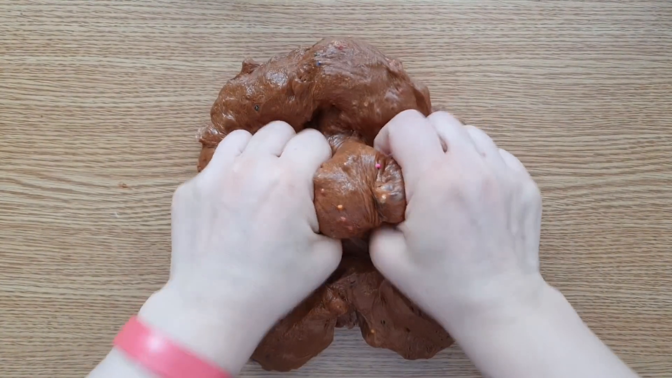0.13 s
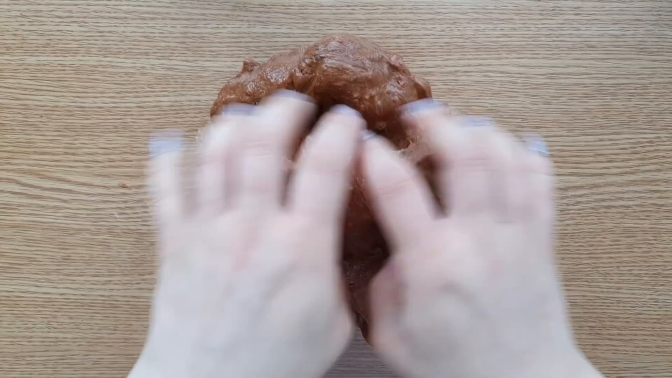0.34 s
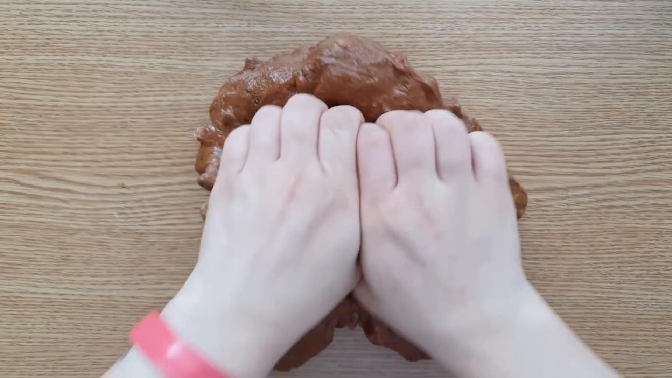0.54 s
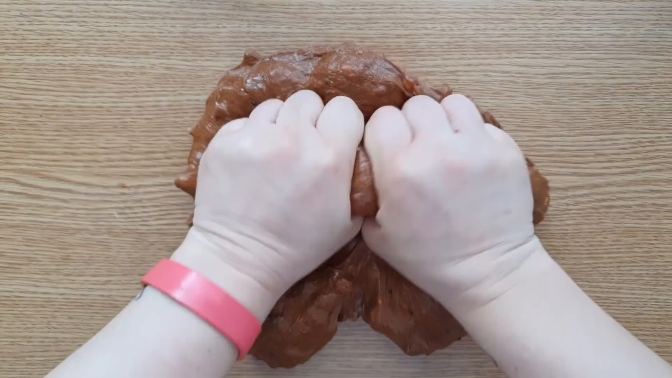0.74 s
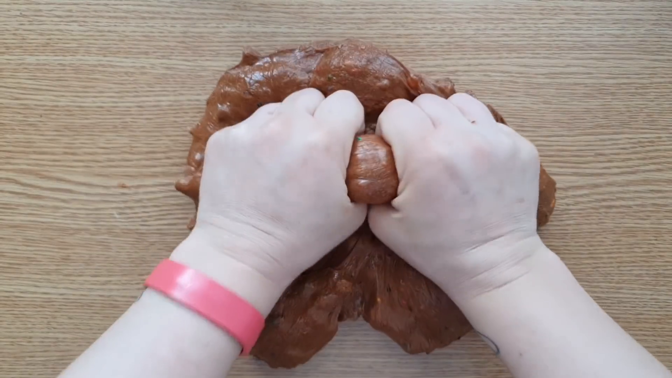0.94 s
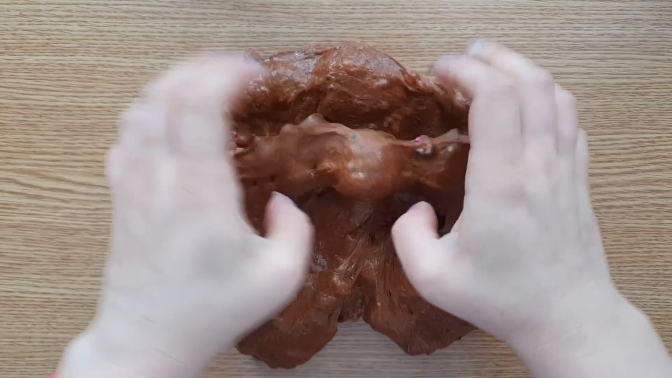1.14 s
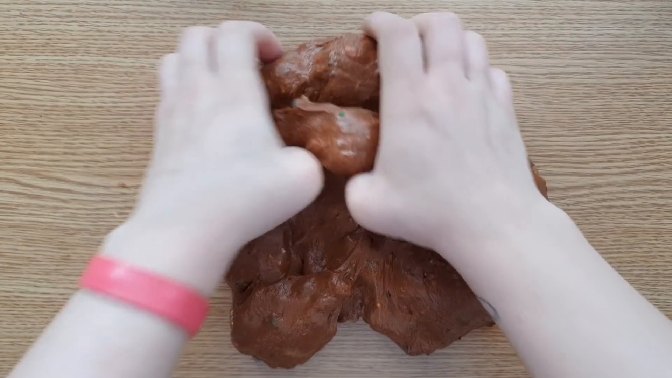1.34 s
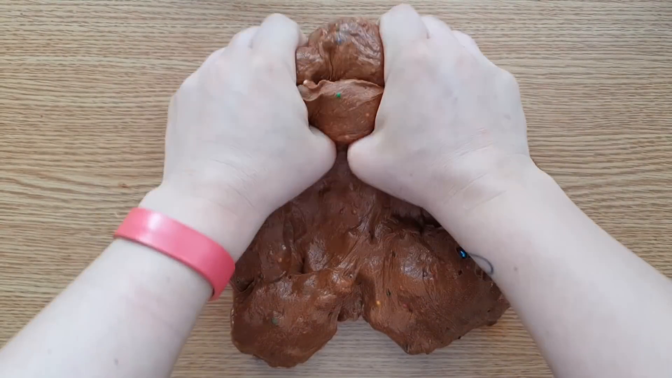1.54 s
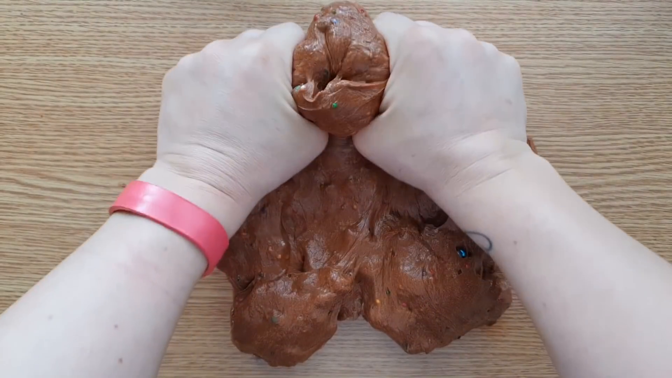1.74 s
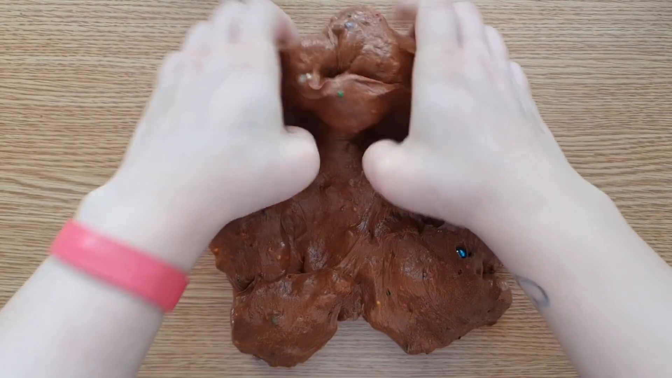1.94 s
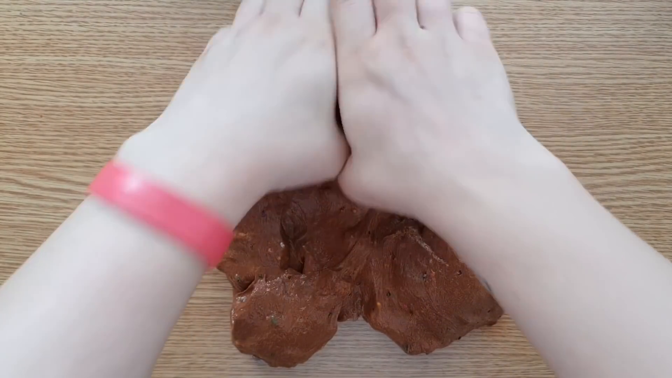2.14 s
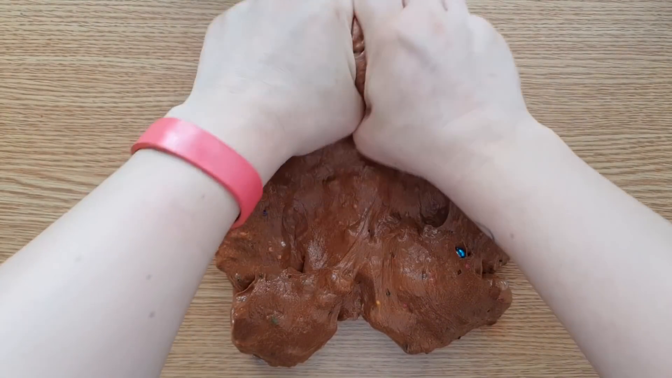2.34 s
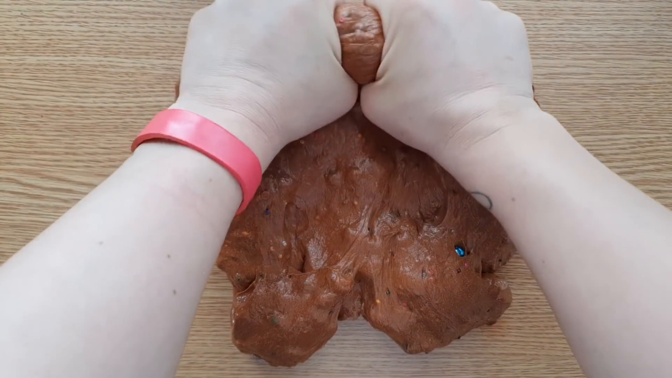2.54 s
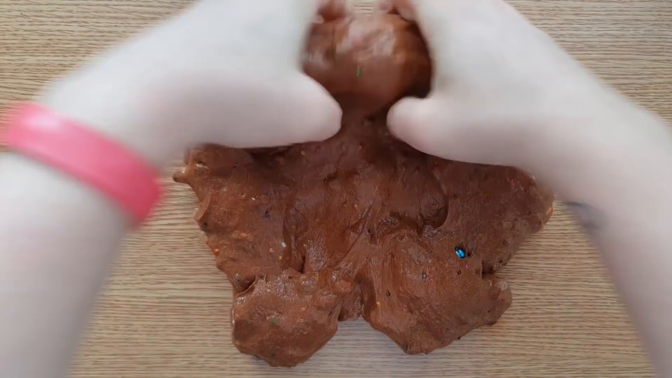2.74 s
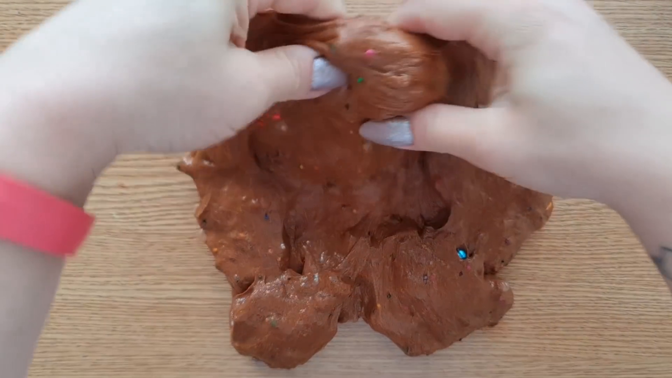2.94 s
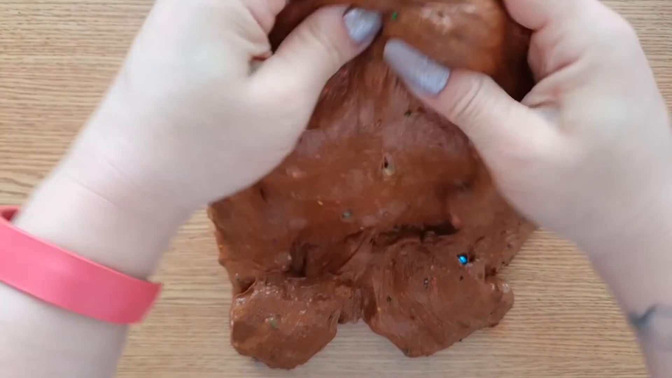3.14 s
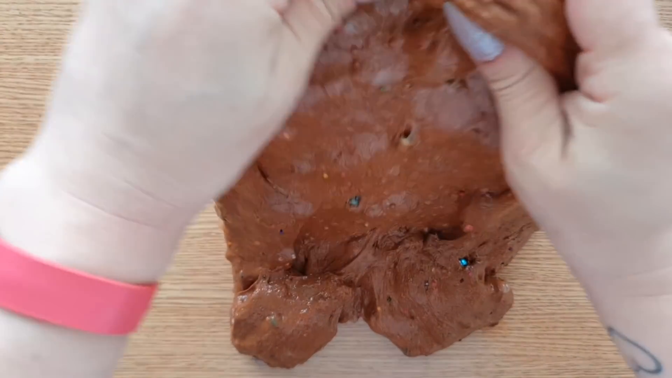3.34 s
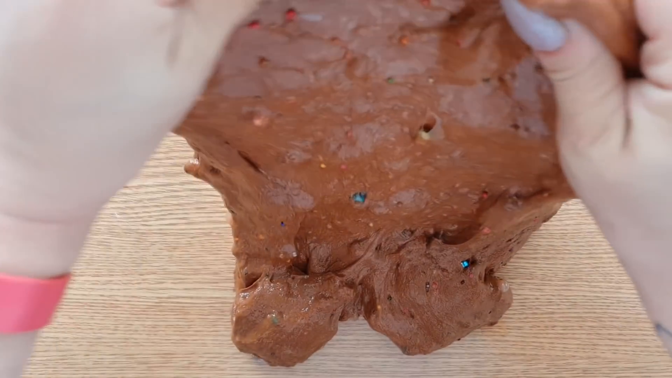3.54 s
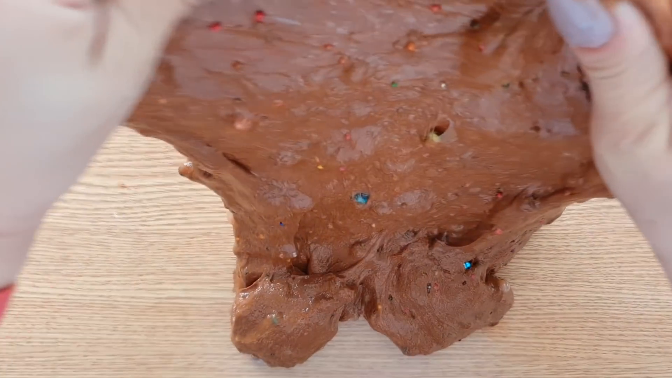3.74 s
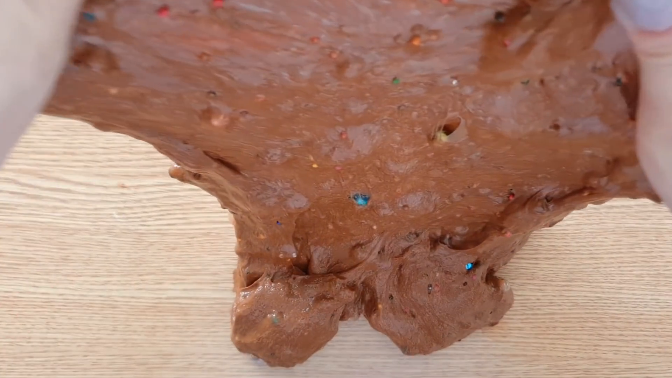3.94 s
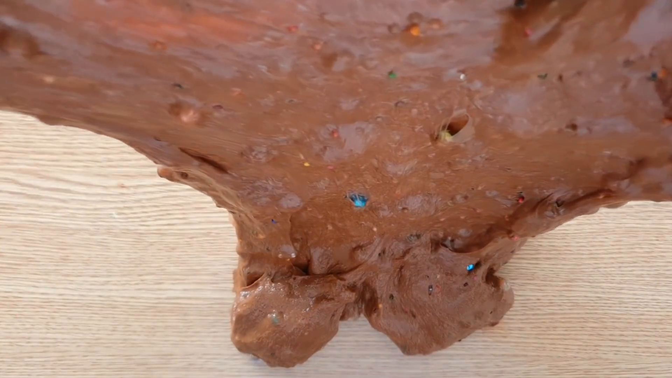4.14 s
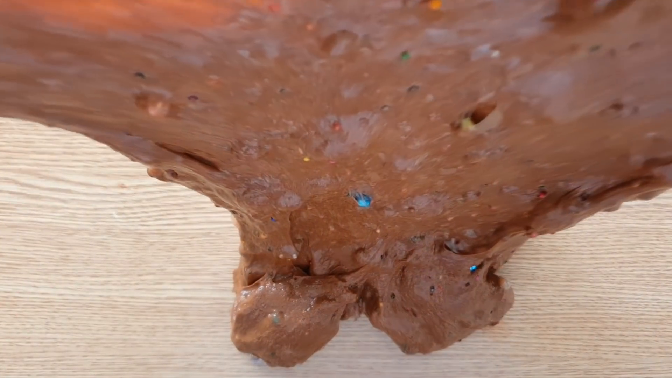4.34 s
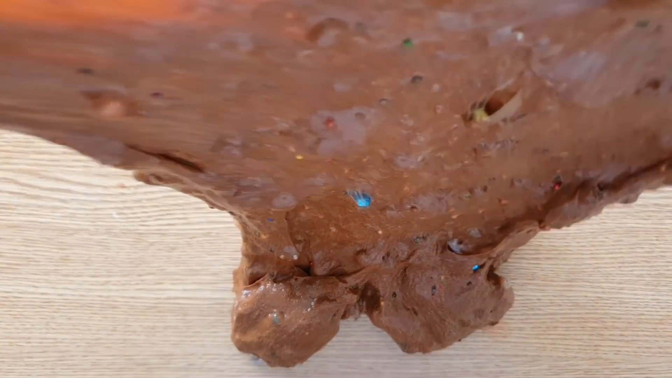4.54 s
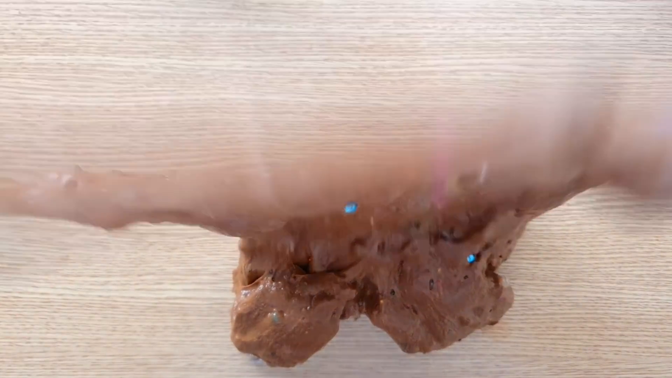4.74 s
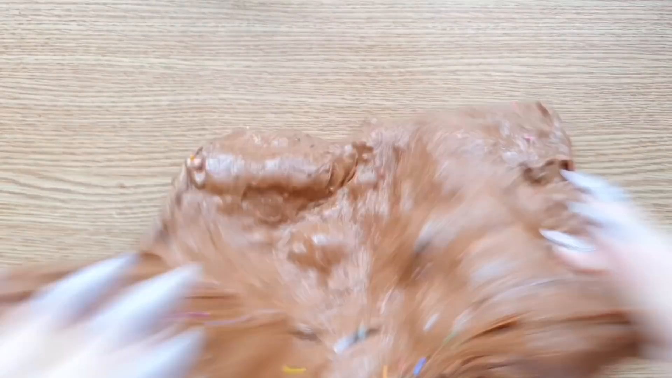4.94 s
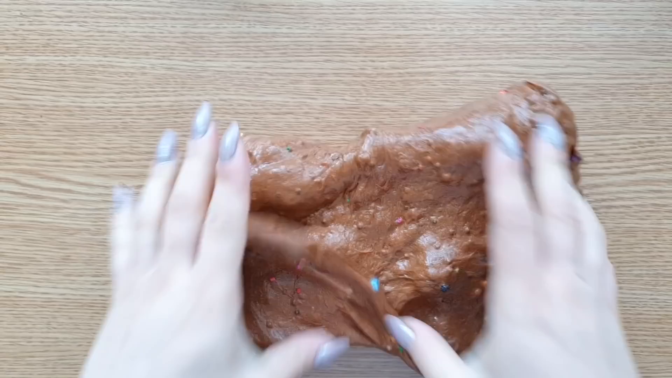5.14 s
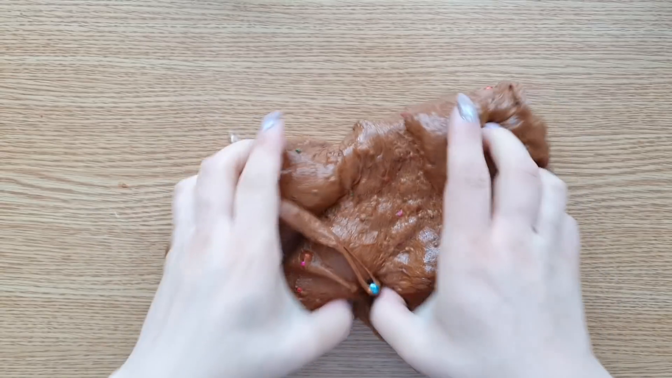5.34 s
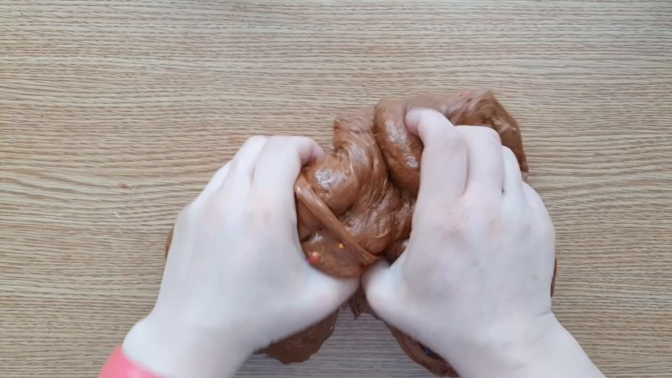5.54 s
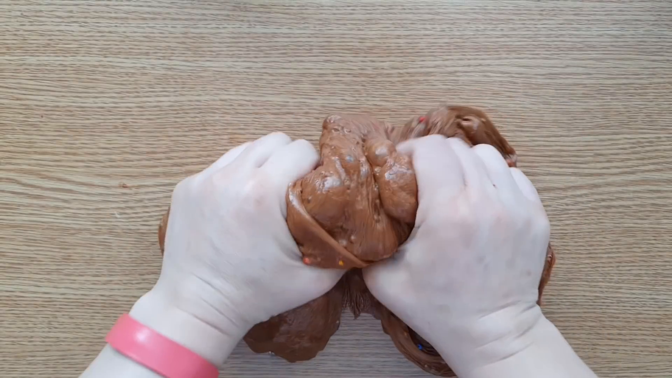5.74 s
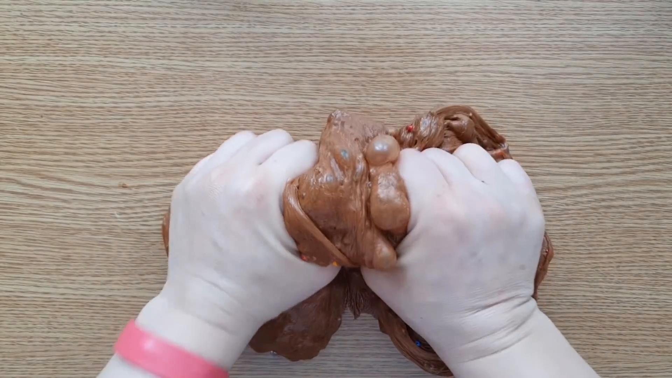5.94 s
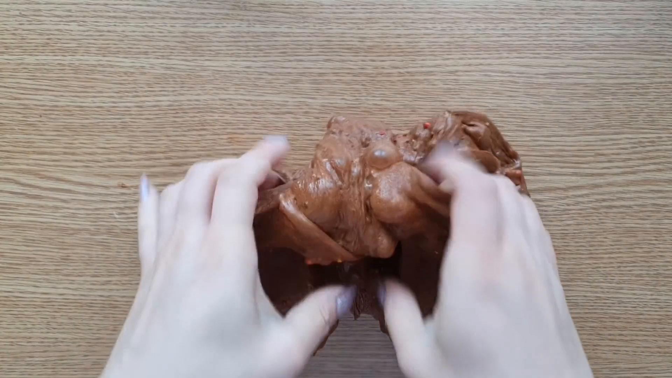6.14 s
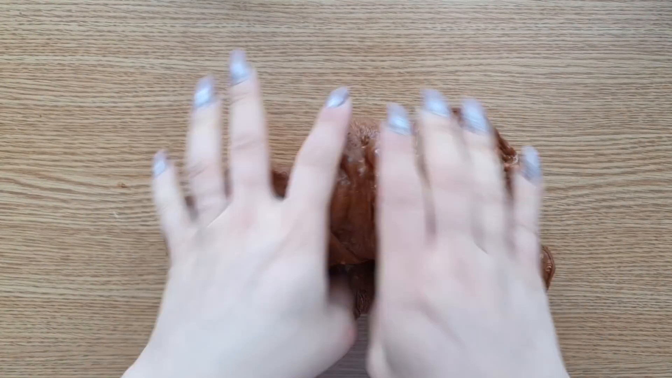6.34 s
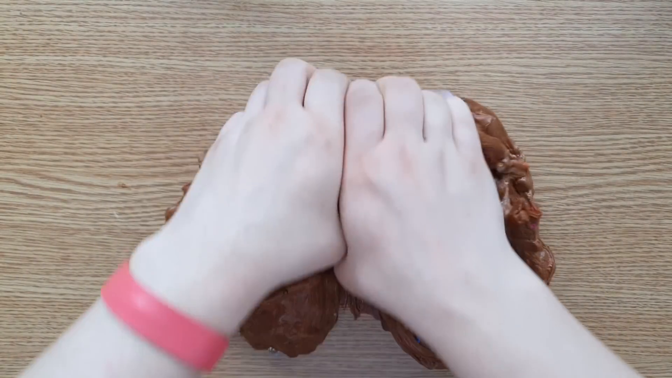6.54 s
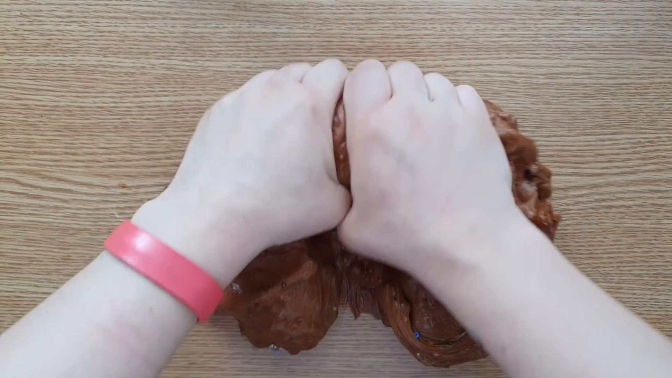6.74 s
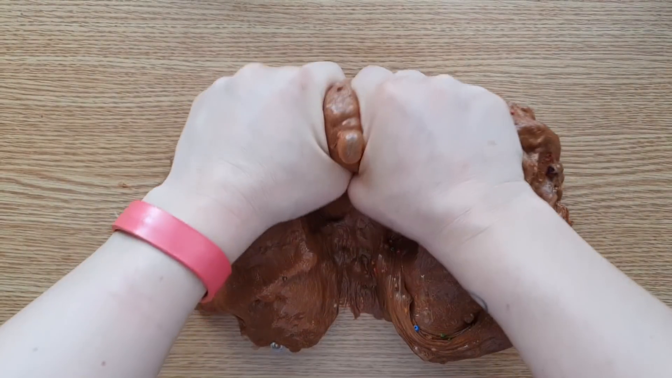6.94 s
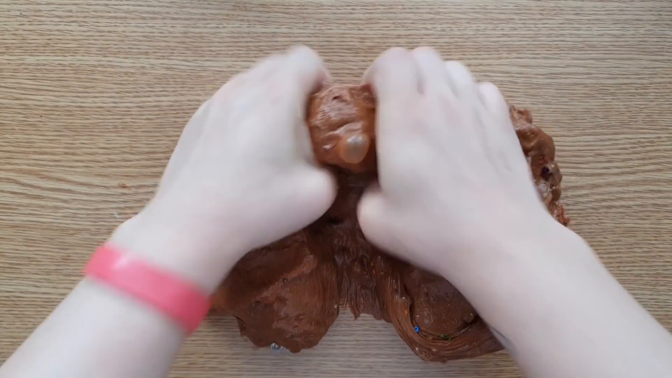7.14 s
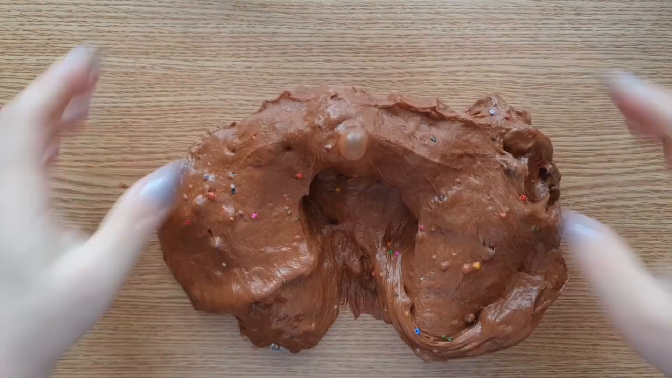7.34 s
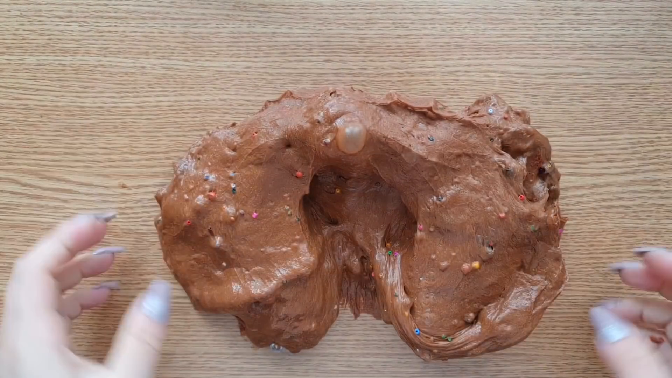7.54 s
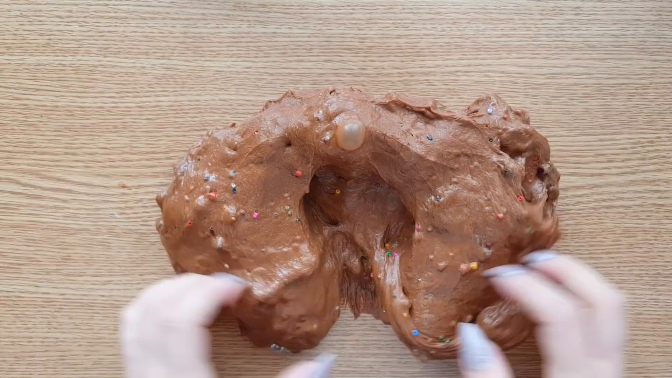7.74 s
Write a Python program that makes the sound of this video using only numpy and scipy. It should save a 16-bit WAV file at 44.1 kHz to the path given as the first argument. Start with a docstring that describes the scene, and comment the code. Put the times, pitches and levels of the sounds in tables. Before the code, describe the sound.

Sticky slime is kneaded close to the microphone. First come hard pops and crunchy crackles, then a short lull and denser squishing with many small snaps. As the slime is drawn into a sheet the sound thins to quiet fizzing. Folding it back brings squelches, short air gurgles and a burst of heavy popping, then near quiet. Soft low table thumps and brief room echo accompany it.

```python
"""A lump of crunchy slime, squeezed, stretched and folded by two hands on a wooden table, in a small, bare,
echoing room. Large air pockets burst as sharp pops: a jolt and a tear ring each cavity, the skin adds a snap.
Swarms of tiny ringing pockets, driven by the strokes of the hands, merge into mash, squelch, crackle and fizz.
Trapped air gurgles in gliding puffs; soft weight thumps as decaying low sines. Table and room resonate,
echoes of decaying noise bands follow, and hiss and rumble of shaped noise lie beneath."""
import sys
import numpy as np
from scipy import signal
from scipy.fft import rfft, irfft, next_fast_len
from scipy.io import wavfile

SR = 44100
rng = np.random.default_rng(int(sys.argv[2]) if len(sys.argv) > 2 else 0)


def output_pcm(signal):
    """Save a mono or channel-first signal as 16-bit PCM at the path in sys.argv[1].

    Samples are clipped to [-1, 1] before scaling.
    """
    pcm = np.clip(np.atleast_2d(signal).T, -1, 1) * 32767
    wavfile.write(sys.argv[1], SR, np.round(pcm).astype(np.int16))


N = 343963
TIME_S = np.arange(N) / SR

# Background noise spectra. Each row: frequency in Hz, relative density in dB.
HISS_SPECTRUM = [(100, 20), (250, 2.5), (550, -11.5), (1200, -6.5), (4000, -15.5), (9000, -19),
                 (16000, -32)]
RUMBLE_SPECTRUM = [(20, -35), (32, -17), (44, 5), (60, -13.5), (85, -14), (140, -17), (300, -35),
                   (1000, -78.5), (20000, -120)]
HISS_DB, RUMBLE_DB = -73.5, -66

# Soft weight landing on the table. Each row: start in seconds, level in dB, frequency in Hz.
TABLE_THUMPS = [(0.169, -44, 62), (0.251, -42.5, 71), (1.0, -45, 127), (1.055, -44, 54),
                (1.891, -42, 125.8), (2.257, -51, 41), (2.501, -44, 44.5), (4.181, -58, 45.4),
                (4.42, -56.5, 46.24), (4.98, -47, 57.82), (5.049, -49, 67.6), (5.435, -44, 61.52),
                (6.03, -50, 78.85), (6.36, -47.5, 43.95), (6.498, -46.5, 54.05), (7.161, -44, 124.5),
                (7.199, -46, 65.02)]

# Room decay. Each row: frequency in Hz, time to fall 60 dB in seconds.
ROOM_DECAY = [(150, 0.48), (600, 0.3), (1400, 0.37), (3700, 0.36), (8000, 0.24), (15000, 0.23)]
# Colour of the echo. Each row: frequency in Hz, relative level in dB.
ECHO_COLOUR = [(100, -7), (400, -1.5), (1000, -1.5), (3000, -1.5), (8000, 1), (15000, -5)]
# Low resonances of table and room. Each row: frequency in Hz, time to fall 60 dB in seconds, relative level in dB.
LOW_RESONANCES = [(67, .4, -7.5), (122, 0.4, -7.5), (205.9, 0.71, -6.5), (243.6, 0.5, -7), (433, .4, -15.5)]

# Trapped air leaving a fold. Each row: start in seconds, length in seconds, first Hz, last Hz, level in dB.
AIR_GURGLES = [(1.231, 0.083, 1050, 850, -62), (1.903, .019, 566, 510, -52), (3.01, 0.037, 272.8, 250, -52),
               (4.872, 0.062, 763, 800, -54.5), (5.225, 0.0093, 940, 900, -40.5),
               (5.26, .06, 930, 540, -41.5), (5.385, 0.092, 277.4, 268.4, -46.5),
               (6.127, .023, 2900, 2720, -40.5), (6.208, .02, 279.5, 250, -43),
               (6.515, 0.052, 776, 650, -45), (7.089, 0.0093, 511.6, 477.3, -35)]

# Pitches of the small bursts. Each row: cavity pitch in Hz, relative level per burst in dB.
MASH_PITCHES = [(130, -4.5), (200, -1), (300, 8.5), (480, -1)]
SQUELCH_PITCHES = [(520, 3.5), (750, -4.5), (1000, 8), (1350, -3)]
CRACKLE_PITCHES = [(1450, -3), (2200, 0.2), (3300, 3), (5300, -4.9)]
FIZZ_PITCHES = [(5700, 1), (7500, 0), (11000, -1.6), (15500, -1)]

# Strokes of the hands. Each row: start in seconds, length in seconds, then levels in dB of palms mashing,
# air squelching, small bubbles crackling, sticky film fizzing.
HAND_STROKES = [(0.0, .025, -56.5, -44, -36, -39), (0.127, 0.088, -42, -44, -42, -48),
                (0.543, .16, -68, -64, -62, -76), (0.745, .1, -44, -50, -47, -64),
                (0.99, .065, -48, -43.5, -42.5, -52.5), (1.278, 0.089, -68, -58, -59, -69.5),
                (1.47, .18, -61.5, -62, -54, -61), (1.846, 0.087, -48, -49, -45, -55.5),
                (2.171, .1, -73, -66, -56, -67.5), (2.31, .2, -61, -53, -50, -58),
                (2.619, 0.094, -50, -46.5, -46, -50), (2.76, .1, -58, -50, -49, -53.5),
                (2.99, 0.043, -51.5, -51, -55, -53), (3.092, 0.13, -68, -60.5, -59, -65.5),
                (4.576, 0.12, -82, -69.5, -66, -60.5), (4.729, .13, -73, -71, -56, -57),
                (5.0, .11, -64, -70, -67.5, -69), (5.246, 0.064, -57, -51, -50, -63.5),
                (5.335, 0.16, -47, -51, -50.5, -55.5), (5.551, .19, -52, -50, -53.5, -63.5),
                (5.81, .08, -41, -47, -50, -50), (6.01, .11, -42, -45, -41, -48),
                (6.385, 0.043, -77, -84.5, -75, -73.5), (6.516, .035, -49.5, -47, -53, -70),
                (6.694, 0.055, -31, -51.5, -48.5, -47.5), (6.831, .15, -43, -47.5, -49.5, -56.5),
                (7.09, .075, -48.5, -41.5, -40.5, -48.5), (7.434, 0.037, -88.5, -64, -61, -74),
                (7.747, 0.066, -70.5, -61, -64.5, -72)]
# Time to rise or fall 20 dB: a fixed part plus a share of the stroke length.
ATTACK_S, ATTACK_SHARE = .015, .3
RELEASE_S, RELEASE_SHARE = .03, .2

# Slime drawn out into a thinning sheet. Each row: time in seconds, fizz curve in dB.
STRETCHED_SHEET = [(3.25, -60), (3.566, -62.5), (3.688, -68), (3.952, -70), (4.088, -67), (4.5, -71)]
STRETCH_FADE_S = .06   # per 20 dB
# Sheet level against its fizz curve. Columns: mash, squelch, crackle, fizz, all in dB.
SHEET_MIX_DB = [-13, -16, -13, -5.5]
# Slime settling by itself. Columns: mash, squelch, crackle, fizz, all in dB.
SETTLING_SLIME_DB = [-90, -92, -89, -95]
SLIPS_PER_S, SLIP_DB = 55, 1.76   # uneven yielding under the fingers

# Larger air pockets. Each row: start in seconds, ring in dB, cavity pitch in Hz, cavity Q, snap of the skin in dB,
# left over right in dB, send to the room in dB.
AIR_POCKETS = [(0.007, -17.5, 4200, 2.3, -50, 3, -1), (0.158, -34, 2500, 1.2, -49, 2.5, 9),
               (0.3975, -44, 4560, 0.35, -75.5, -1, 0), (0.5059, -49, 4770, 0.67, -68, 9.5, 9),
               (0.5292, -41, 3670, 1.34, -51, 2, -7.5), (0.609, -41, 4370, 0.96, -49, 1, 8),
               (0.6156, -31.5, 4050, 2.1, -26, 1, -13), (0.635, -40.5, 1370, 0.72, -32, 6, -7.5),
               (0.6776, -38, 2640, 0.78, -48, -3, -9.5), (0.726, -11, 2300, 1.43, -46.5, 1, 5.5),
               (0.7717, -30.5, 2330, 1.6, -17, -2, -7.5), (0.84, -18.5, 2920, 0.66, -24.5, 7, 2),
               (1.2486, -49, 2360, .9, -63, 12.5, -5), (1.292, -48.5, 2020, .9, -71, 9.5, 7.5),
               (1.3805, -33.5, 2534, 0.43, -39, 14, 4), (1.3851, -27, 5510, .9, -58, 1.5, -11.5),
               (1.3995, -30, 3835, 0.47, -55, -3.5, -3), (1.4916, -35.5, 5690, 1.06, -61, 5.5, 0),
               (1.543, -34.5, 2950, 2.1, -60, 13, 7.5), (1.5249, -33, 2930, 1.5, -31.5, 3, 1.5),
               (1.5697, -36, 2530, 1.5, -31, 3, -2), (1.6123, -30, 2600, 1.2, -62, 0, -3),
               (1.6359, -23.5, 3530, 1.3, -29, 5, 5.5), (1.6524, -33, 3000, 1.1, -23, -5.5, 4),
               (1.661, -19.5, 5305, 1.07, -22, -2.5, -2.5), (1.8604, -27.5, 1880, 1.7, -55, 2, -3),
               (2.108, -47, 2710, 1.9, -56, 4, 1), (2.1542, -47, 2637, 2.1, -69, 8, -33),
               (2.2237, -37, 2410, 1.36, -67, 4, 4.5), (2.2587, -33.5, 8000, 0.65, -65, 4, -3),
               (2.3804, -27.5, 4570, 1.5, -27.5, -0.5, -15), (2.3012, -30.5, 2388, 2, -58, 1, 3.5),
               (2.338, -27, 3720, 1.4, -31.5, 2.5, -5), (2.387, -24, 4000, 0.9, -29, 0.5, 2),
               (2.4345, -23, 2290, 1.1, -24, 1, -5), (2.4832, -19, 4097, 1.28, -15.5, -2, -1),
               (2.4908, -31, 1850, 1.3, -17.5, 3, -11), (2.5303, -21, 2650, 0.65, -41, 1.5, -3),
               (2.9798, -27.5, 3806, 1.43, -31.5, 6.5, -1), (3.2922, -49, 1234, 3.6, -44.5, 3, 2),
               (3.3674, -43, 2050, 0.76, -82, 2, 6.5), (3.4753, -44, 4565, 0.89, -70, 9.5, -5.5),
               (3.546, -51, 1300, 2.4, -48, 5, -6), (3.652, -36, 7090, 1.33, -58, -0.5, -2.5),
               (3.863, -51, 6550, 3.5, -62, 6, -5), (3.922, -48, 9990, 3.05, -63, -8, -3.5),
               (4.0824, -41.5, 11600, 3.95, -52.5, -7, -5.5), (4.129, -42, 12000, 4.6, -47.5, -1.5, -7.5),
               (4.2216, -28.5, 11600, 7.8, -42.5, -9, -4), (4.4311, -59.5, 6700, 2.2, -73, 13, 1),
               (4.5089, -55.5, 4053, 0.96, -72, 2, 2), (4.5579, -46, 3733, 1.06, -69, 15, 5.5),
               (4.7942, -43, 2800, 4.1, -65, 18, 2), (4.8622, -38, 903, 8, -57.5, 2, -7),
               (4.9373, -44.5, 2986, 0.64, -42, 15, 1), (5.0487, -47, 910, 4.1, -72, 3.5, 1.5),
               (5.1538, -41.5, 2906, 3.6, -78, 6.5, -1.5), (5.2136, -39.5, 3030, 1.7, -69.5, 10, 5.5),
               (5.2524, -39, 3750, 1.8, -43, 14, -13), (5.3365, -21.5, 2266, 0.44, -46, 7, -1.5),
               (5.406, -34.5, 900, 1.47, -23.5, 17.5, 1.5), (5.4302, -32, 1235, 2.9, -28, 2, 0.5),
               (5.5746, -40.5, 3170, 0.78, -43, 0.5, 10), (5.6127, -33.5, 1469, 1, -32, 5.5, -22),
               (5.6895, -29, 1749, 0.83, -34.5, -2, 3.5), (5.702, -22.5, 3597, 3.4, -42, 4, -6),
               (5.7109, -21, 3460, 3.3, -51.5, 2.5, -10), (5.7951, -10, 3200, 2.37, -21, 0, 4.5),
               (6.0906, -31, 590, 3.7, -54, -4.5, 0), (6.1123, -24.5, 2600, 1.41, -43, 5.5, -19.5),
               (6.2094, -31.5, 2780, .9, -34.5, 2.5, -6), (6.3764, -53, 761.3, 0.95, -80, -4.5, -1),
               (6.4961, -36.5, 2199, 0.41, -46.5, 8.5, 7.5), (6.653, -25.5, 2567, 0.99, -36.5, 2, -6.5),
               (6.6785, -28, 1007, 0.8, -43.5, 0, -11), (6.696, -8.5, 1260, 1.5, -49, -1.5, 3),
               (6.7352, -7.5, 2470, 1.4, -15, 7.5, -3.5), (6.8038, -5.5, 2355, 0.97, -16.5, 8.5, -3.5),
               (6.8378, -23.5, 2479, 1.25, -52, -2.5, 3.5), (6.8545, -16.5, 4390, 0.94, -25, 6.5, -4.5),
               (6.8605, -5.5, 759, 3.13, -24, -4, -2.5), (6.8694, -14.5, 1990, 0.58, -54, 1.5, -4.5),
               (6.8869, -16.5, 1837, 0.57, -25.5, -3, 8), (6.9428, -19.5, 11500, 3.4, -23, 7.5, -1),
               (6.9513, -24, 2311, 0.84, -12.5, -6.5, -15), (7.4212, -58.5, 2017, 0.96, -71.5, 6, 14.5),
               (7.7051, -54, 2761, 1.3, -80, 7, 7.5)]

CUTOFF_HZ = 15800


def from_db(db):
    """Decibels to gain."""
    return 10 ** (np.asarray(db) / 20)


def rms_one(x):
    """Scale to rms 1."""
    return x / np.sqrt(np.mean(x ** 2) + 1e-30)


def unit_energy(x):
    """Scale a short sound to energy 1 in each channel."""
    return x / np.sqrt(np.sum(x ** 2, axis=-1, keepdims=True) + 1e-30)


def at_hz(points, hz):
    """Read a table on a log-frequency axis."""
    known_hz, values = np.transpose(points)
    return np.interp(np.log(np.maximum(hz, 1)), np.log(known_hz), values)


def cut(x, hz, kind, order=2):
    """Butterworth filter."""
    sos = signal.butter(order, np.minimum(hz, .45 * SR), kind, fs=SR, output="sos")
    return signal.sosfilt(sos, x)


def drift(per_s):
    """Slow random wandering of rms 1."""
    knots = rng.standard_normal(4000)
    return rms_one(np.interp(TIME_S * per_s, np.arange(len(knots)), knots))


def add(track, start_s, sound):
    """Mix a sound in at its moment."""
    start = max(round(start_s * SR), 0)
    part = sound[..., :track.shape[-1] - start]
    track[..., start:start + part.shape[-1]] += part


def coloured(spectrum):
    """Two unrelated channels of steady noise with the given spectrum, rms 1."""
    size = next_fast_len(N, True)
    gain = from_db(at_hz(spectrum, np.fft.rfftfreq(size, 1 / SR)))
    noise = irfft(rfft(rng.standard_normal((2, size))) * gain, size)
    return rms_one(noise[:, :N])


def quiet_background():
    """Unrelated hiss in the two channels over a nearly central rumble."""
    centre, side = coloured(RUMBLE_SPECTRUM)
    rumble = centre + .15 * side * [[1], [-1]]
    return from_db(HISS_DB) * coloured(HISS_SPECTRUM) + from_db(RUMBLE_DB) * rumble


def room(x, build_s=0.00067, hold_s=0.054, alike_hz=900):
    """A bright early reflection, then a dense tail, decaying band by band and alike at both ears in the bass."""
    t, hz = np.arange(SR) / SR, np.fft.rfftfreq(SR, 1 / SR)
    first_echo_s = .0053
    mid, side = rfft(rng.standard_normal((2, SR)))
    alike = 1 / (1 + (hz / alike_hz) ** 2)
    field = np.sqrt(1 + alike) * mid + np.sqrt(1 - alike) * side * [[1], [-1]]
    field = field * from_db(at_hz(ECHO_COLOUR, hz))
    swell = 1 - np.exp(-np.maximum(t - first_echo_s, 0) / build_s)
    reflection = signal.unit_impulse(SR, round(first_echo_s * SR))
    response = from_db(-14) * cut(reflection, 7000, "high")
    edges_hz = np.r_[0, np.geomspace(150, SR / 2, 14)]
    for low_hz, high_hz in zip(edges_hz, edges_hz[1:]):
        t60_s = at_hz(ROOM_DECAY, (low_hz + high_hz) / 2)
        # nearly level at first, then falling
        decay = unit_energy(swell * from_db(-60 * np.hypot(t, hold_s) / t60_s))
        band = irfft(field * ((hz >= low_hz) & (hz < high_hz)), SR)
        response = response + band * decay / np.sqrt(2)
    return signal.fftconvolve(x, response, axes=1)[:, :N]


def booms(x):
    """Pressing sets the low resonances of table and room ringing as decaying sines."""
    t = np.arange(SR) / SR
    response = np.zeros(SR)
    for hz, t60_s, level_db in LOW_RESONANCES:
        ring = np.sin(2 * np.pi * hz * t) * from_db(-60 * t / t60_s)
        response += from_db(level_db) * unit_energy(ring)
    return signal.fftconvolve(x.mean(0), response)[:N]


def thumps(rise_s=0.0047, t60_s=.35):
    """The table gives a dull, slowly starting swing under the soft weight."""
    out, t = np.zeros(N), np.arange(SR // 2) / SR
    for start_s, level_db, hz in TABLE_THUMPS:
        envelope = from_db(level_db - 60 * t / t60_s) * (1 - np.exp(-t / rise_s))
        add(out, start_s, envelope * np.sin(2 * np.pi * hz * t))
    return out


def cavity(push, hz, q):
    """An opened air pocket rings for a few cycles; the soft wall dulls all far above its pitch."""
    hz = min(hz, .42 * SR)
    b, a = signal.iirpeak(hz, max(q, hz / (.4 * SR)), fs=SR)
    ringing = signal.lfilter(b, a, push + 1e-18)
    return cut(ringing, 3 * hz, "low")


def gurgles(puffs_per_s=160, q=7, waver_db=2.0):
    """Air escapes in quick uneven puffs, each ringing a pocket whose pitch glides as the fold moves."""
    out = np.zeros(N)
    for start_s, length_s, first_hz, last_hz, level_db in AIR_GURGLES:
        chance = rng.standard_normal((24, 3))
        puffs = max(round(length_s * puffs_per_s), 1)
        for k, (late, detune, strength) in enumerate(chance[:puffs]):
            along = np.clip((k + 0.31 * late) / puffs, 0, 1)
            hz = first_hz * (last_hz / first_hz) ** along * from_db(waver_db * detune)
            puff = unit_energy(cavity(signal.unit_impulse(1024), hz, q))
            gain = np.sqrt(SR / puffs_per_s) * from_db(level_db + 2 * strength)
            add(out, start_s + along * length_s, puff * gain)
    return out


def held(start_s, end_s, attack_s, release_s):
    """Envelope in dB: swell, hold at 0, let go; the times are per 20 dB."""
    before = np.clip((start_s - TIME_S) / attack_s, 0, 6)
    after = np.clip((TIME_S - end_s) / release_s, 0, 6)
    return -20 * (before + after)


def kneading():
    """Level in dB of each swarm: the strongest of strokes, stretched sheet and settling slime, made uneven."""
    times_s, sheet_db = np.transpose(STRETCHED_SHEET)
    sheet = np.interp(TIME_S, times_s, sheet_db)
    sheet = sheet + held(times_s[0], times_s[-1], STRETCH_FADE_S, STRETCH_FADE_S)
    levels_db = np.maximum(np.c_[SETTLING_SLIME_DB], sheet + np.c_[SHEET_MIX_DB])
    for start_s, length_s, *swarm_db in HAND_STROKES:
        attack_s = ATTACK_S + ATTACK_SHARE * length_s
        release_s = RELEASE_S + RELEASE_SHARE * length_s
        push = held(start_s, start_s + length_s, attack_s, release_s)
        levels_db = np.maximum(levels_db, push + np.c_[swarm_db])
    return levels_db + SLIP_DB * drift(SLIPS_PER_S)


def bursts(level_db, pitches, per_s, spread_db, q, pan_db, count=10):
    """A swarm of tiny pockets of random size, pitch and place; a harder squeeze bursts more of them, in clumps."""
    # per_s is the rate at -49 dB, before clumping
    rate = per_s * from_db((level_db + 49) / 4 + 3 * drift(60))
    born = np.flatnonzero(rng.random(N) < rate / SR)
    size, pan, sign, kind = rng.random((len(born), 4)).T
    size = from_db(spread_db * np.minimum(-np.log(1 - size), 3.2)) * np.sign(sign - .5)
    # rarer bursts are made stronger, so that the swarm follows level_db
    size = rms_one(size) * np.sqrt(SR / rate[born]) * from_db(level_db[born])
    sides = from_db(pan_db * (2 * pan - 1) * np.array([[1], [-1]]))
    centres_hz = np.geomspace(pitches[0][0], pitches[-1][0], count)
    gains = rms_one(from_db(at_hz(pitches, centres_hz)))
    out = np.zeros((2, N))
    for k, (hz, gain) in enumerate(zip(centres_hz, gains)):
        mine = (kind * count).astype(int) == k
        length = round(12 * SR / hz)   # twelve cycles
        ring = cavity(signal.unit_impulse(length), hz, q)
        shape = gain * unit_energy(cut(ring, hz / 2, "high"))
        where = (born[mine, None] + np.arange(length)).ravel()
        for channel, side in zip(out, sides):
            rings = np.outer((size * side)[mine], shape).ravel()
            channel += np.bincount(where, rings, N)[:N]
    return out


def placed(sound, pan_db, lag_s):
    """Place a source by level and arrival time; a positive lag delays the right channel."""
    lag = round(lag_s * SR)
    pair = [np.roll(sound[0], max(-lag, 0)), np.roll(sound[1], max(lag, 0))]
    return np.array(pair) * from_db([[pan_db / 2], [-pan_db / 2]])


def pop(push, ring_db, hz, q, snap_db, low_cut_hz=200, snap_hz=5600):
    """A push rings the cavity, and the bursting skin adds a bright snap; levels are rms over 3 ms."""
    ring = unit_energy(cut(cavity(push, hz, q), low_cut_hz, "high", order=1))
    snap = unit_energy(cut(cut(push + 1e-18, snap_hz, "high"), 14000, "low"))
    return np.sqrt(.003 * SR) * (from_db(ring_db) * ring + from_db(snap_db) * snap)


def pops(count=2):
    """Each pocket gives way with a jolt and a short tear of its skin; returns near sound and alternating room feeds."""
    near, sent = np.zeros((2, N)), np.zeros((count, 1, N))
    t = np.arange(512) / SR
    jolt = 1.0 * (t == 0)
    for k, (start_s, ring_db, hz, q, snap_db, pan_db, room_db) in enumerate(AIR_POCKETS):
        rip = rng.standard_normal((2, len(t)))
        tear = unit_energy((rip + .6 * rip[::-1]) * np.exp(-t / .0011))
        lag_s = .00003 + .000008 * pan_db + .00002 * rng.standard_normal()
        sound = pop(np.vstack([jolt + tear, jolt]), ring_db, hz, q, snap_db)
        add(near, start_s, placed(sound[:2], pan_db, lag_s))
        # for a smooth echo, the room feed is ring and snap of the jolt alone
        add(sent[k % count], start_s, sound[2] * from_db(room_db))
    return near, sent


def scene():
    """Pops, gurgles and swarms of small bursts under the hands, in the room, over its quiet background."""
    mash_db, squelch_db, crackle_db, fizz_db = kneading()
    mash = bursts(mash_db, MASH_PITCHES, per_s=500, spread_db=7, q=2.1, pan_db=3.0, count=6)
    squelch = bursts(squelch_db, SQUELCH_PITCHES, per_s=600, spread_db=6.0, q=4.6, pan_db=5.5, count=7)
    crackle = bursts(crackle_db, CRACKLE_PITCHES, per_s=650, spread_db=1.5, q=4.2, pan_db=9)
    fizz = bursts(fizz_db, FIZZ_PITCHES, per_s=2600, spread_db=4, q=2.2, pan_db=12, count=7)
    # sparser, middling pockets tick out of the crackle
    ticks = bursts(crackle_db, CRACKLE_PITCHES, per_s=55, spread_db=3.0, q=0.61, pan_db=8, count=5)
    ticks = from_db(-5.5) * ticks
    swarm = mash + squelch + crackle + fizz + gurgles()
    near, sent = pops()
    # pops alternate between two random echo patterns; the swarm has a third
    pop_echoes = sum(room(feed) for feed in sent)
    swarm_echoes = from_db(-1.0) * room(swarm + .5 * ticks)
    resonance = booms(from_db(-21.5) * mash + from_db(-9.5) * near)
    slime = near + swarm + ticks + pop_echoes + swarm_echoes + resonance + thumps()
    return slime * from_db([[.6], [-.6]]) + quiet_background()


def record(dry):
    """The loudest pops overload the input softly; a steep low-pass cuts the top."""
    overloaded = .85 * np.tanh(dry / .85)
    return signal.sosfilt(signal.ellip(10, .1, 80, CUTOFF_HZ, fs=SR, output="sos"), overloaded)


dry = scene()
out = record(dry)
output_pcm(out)
```